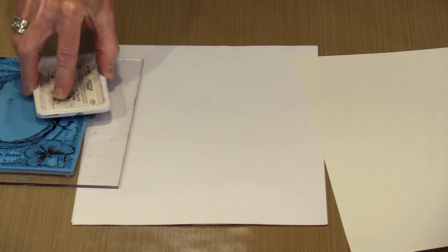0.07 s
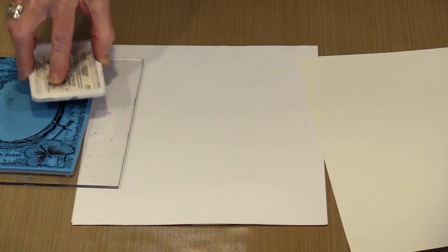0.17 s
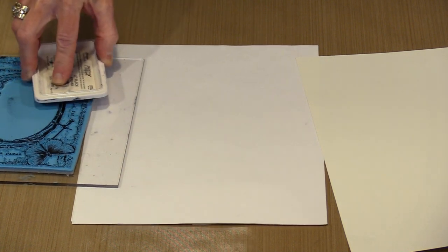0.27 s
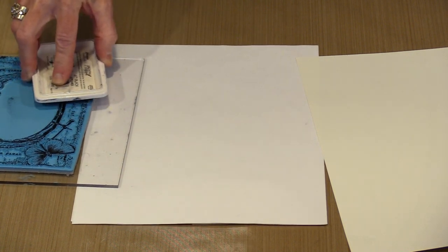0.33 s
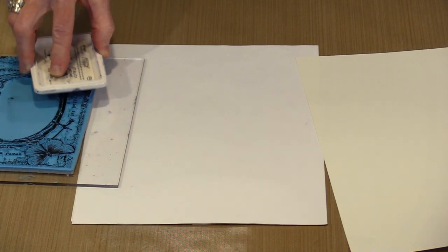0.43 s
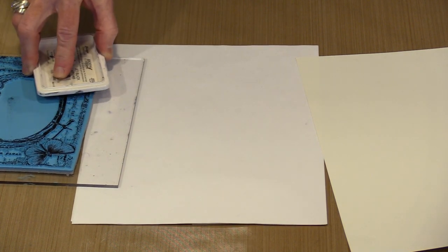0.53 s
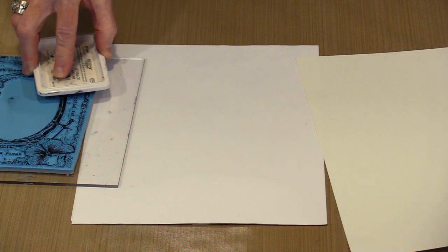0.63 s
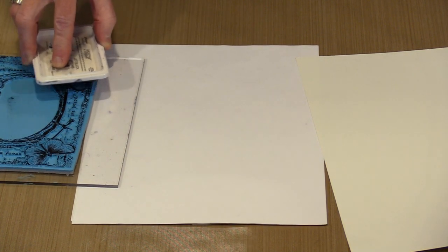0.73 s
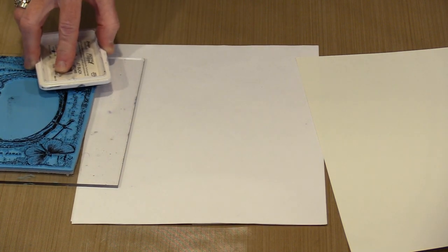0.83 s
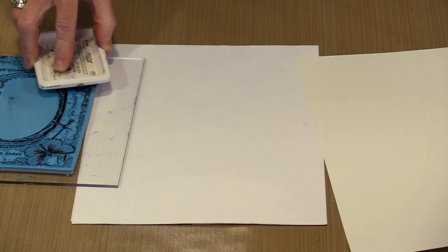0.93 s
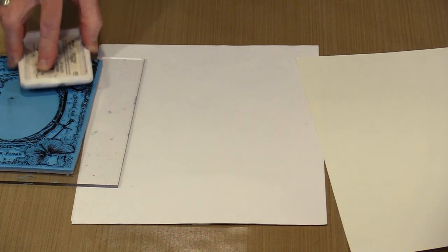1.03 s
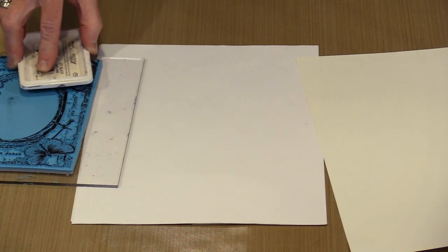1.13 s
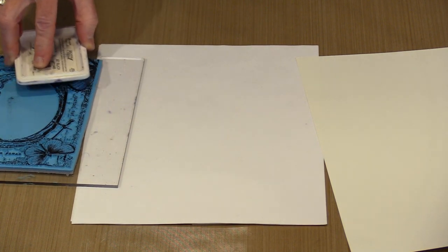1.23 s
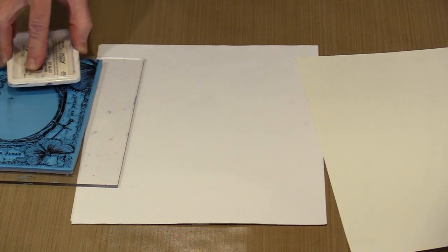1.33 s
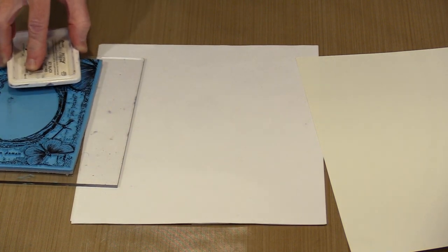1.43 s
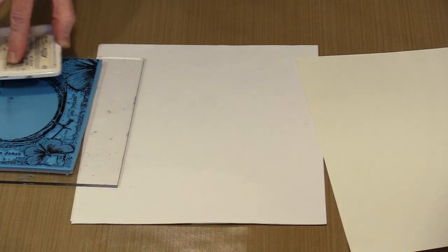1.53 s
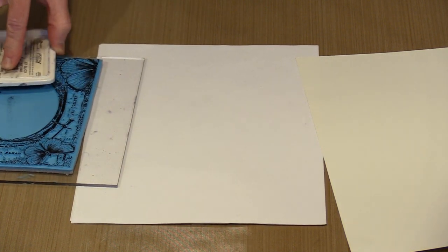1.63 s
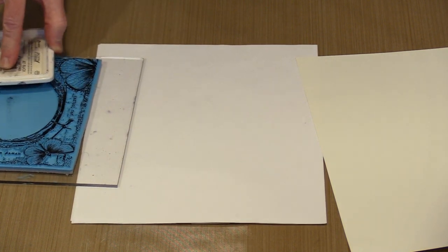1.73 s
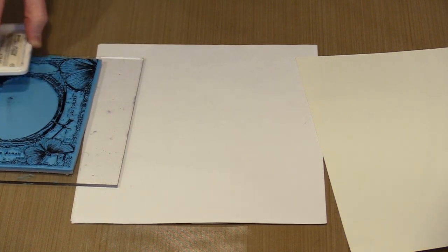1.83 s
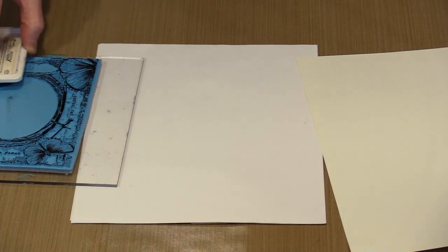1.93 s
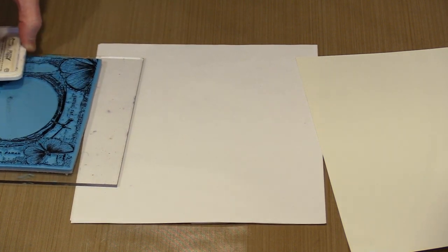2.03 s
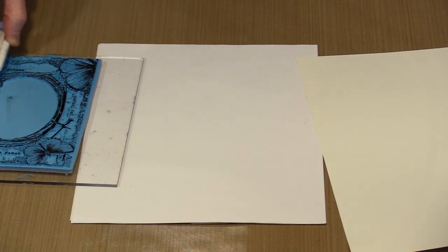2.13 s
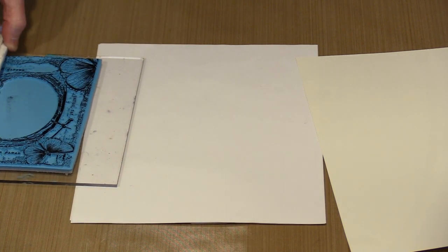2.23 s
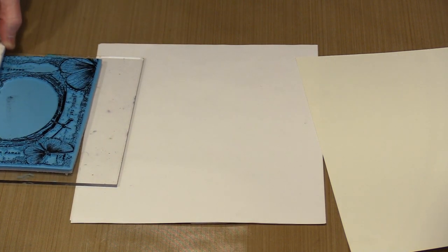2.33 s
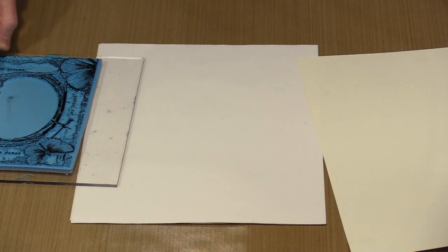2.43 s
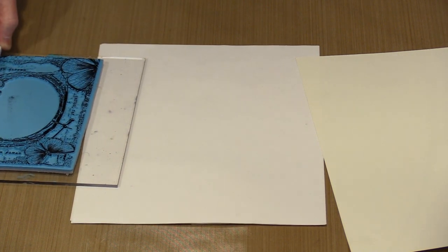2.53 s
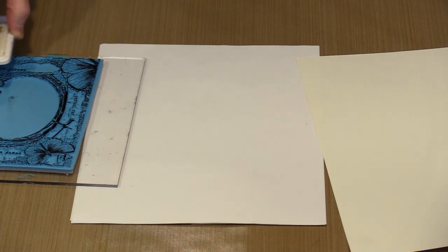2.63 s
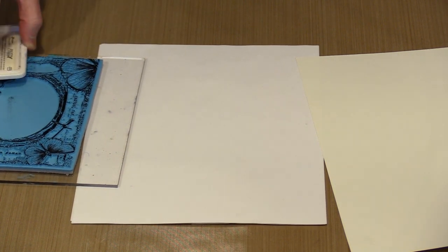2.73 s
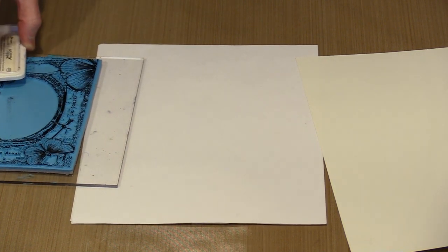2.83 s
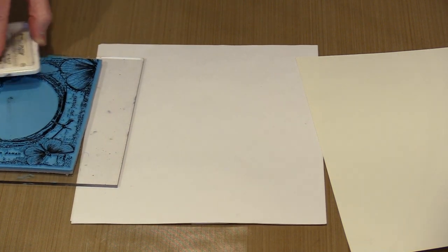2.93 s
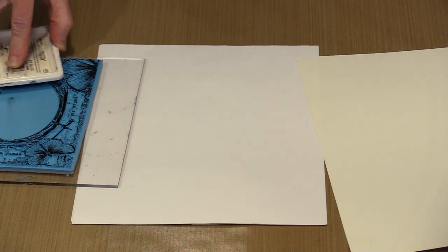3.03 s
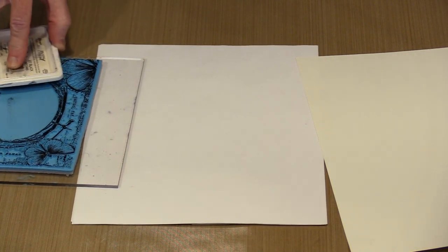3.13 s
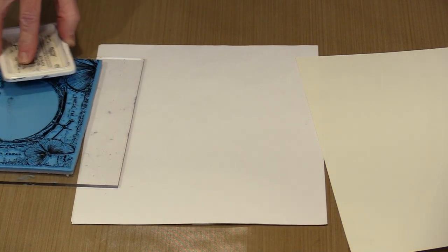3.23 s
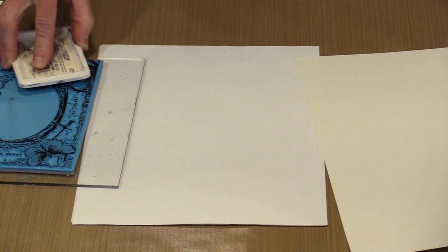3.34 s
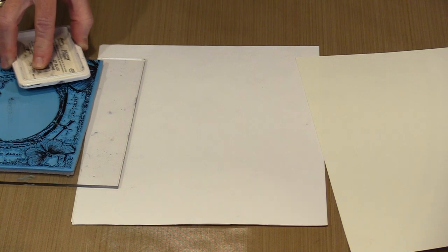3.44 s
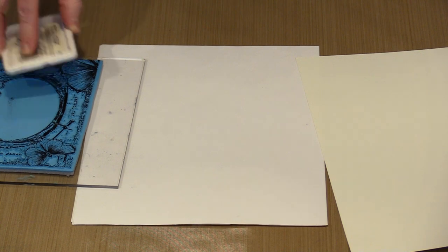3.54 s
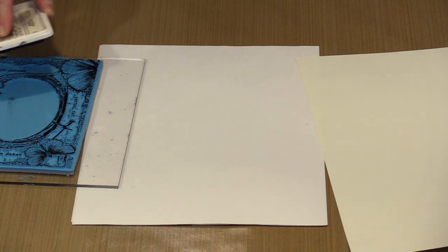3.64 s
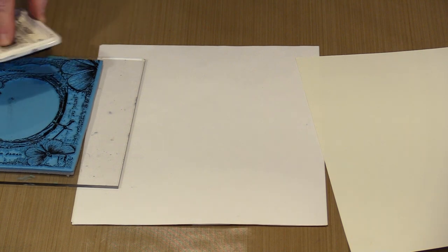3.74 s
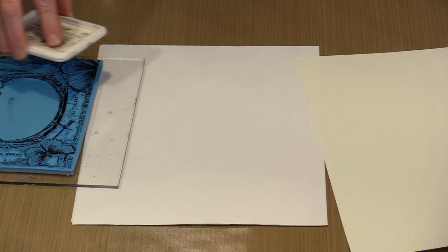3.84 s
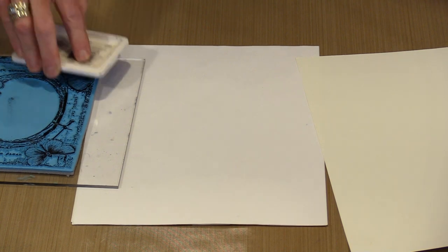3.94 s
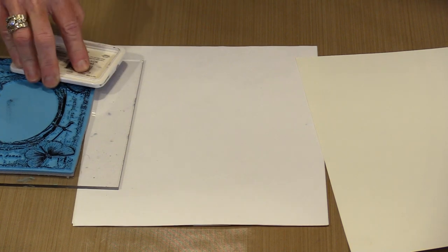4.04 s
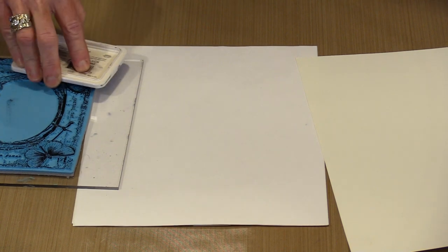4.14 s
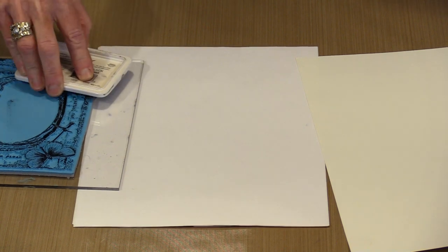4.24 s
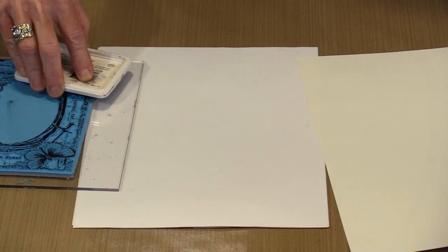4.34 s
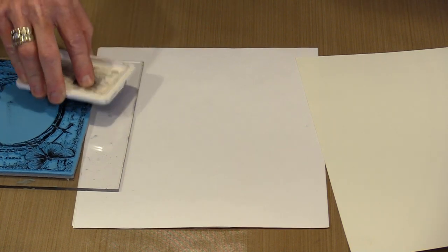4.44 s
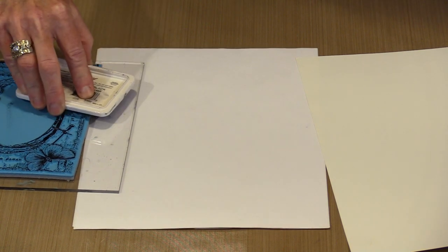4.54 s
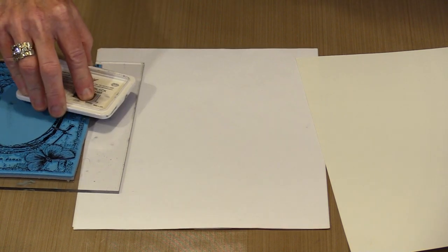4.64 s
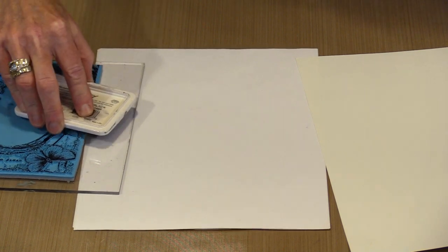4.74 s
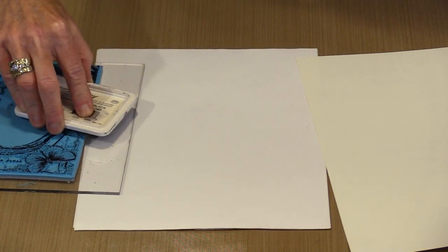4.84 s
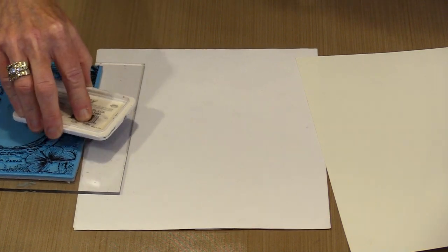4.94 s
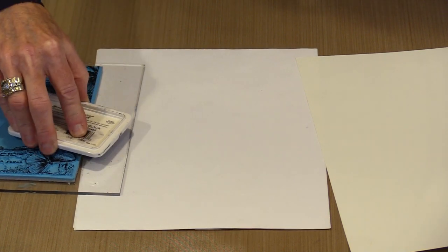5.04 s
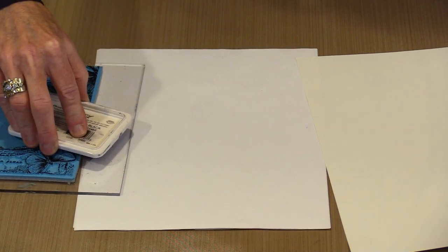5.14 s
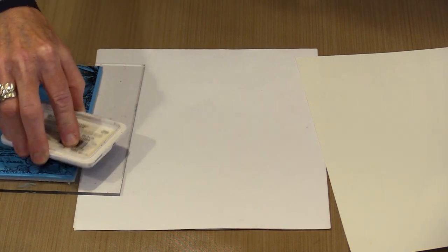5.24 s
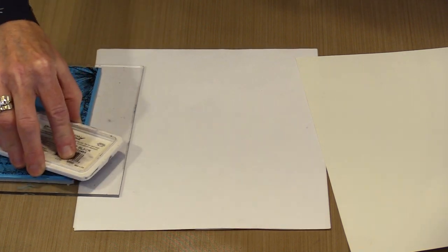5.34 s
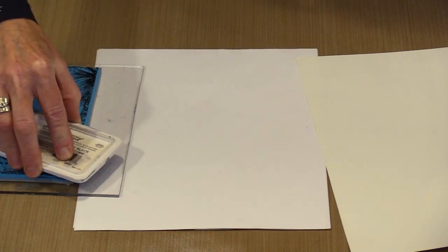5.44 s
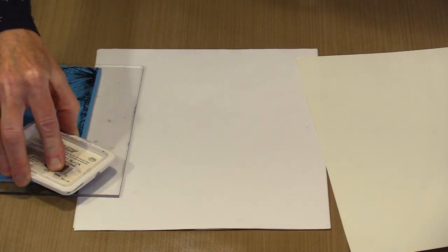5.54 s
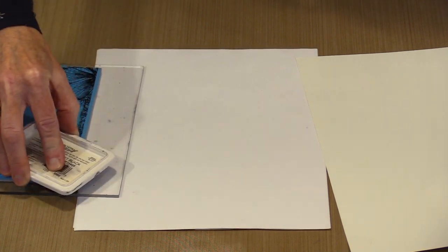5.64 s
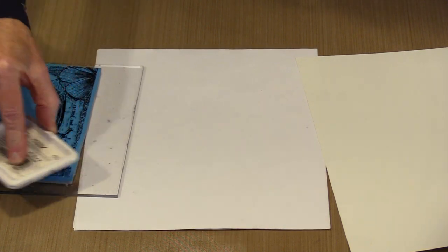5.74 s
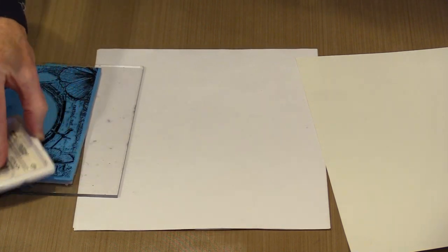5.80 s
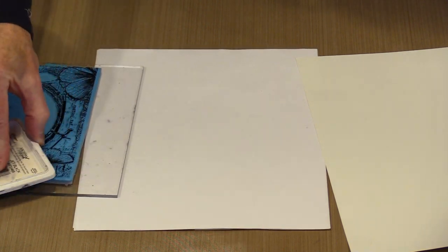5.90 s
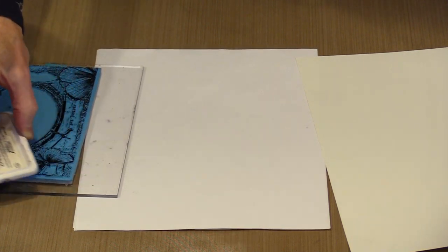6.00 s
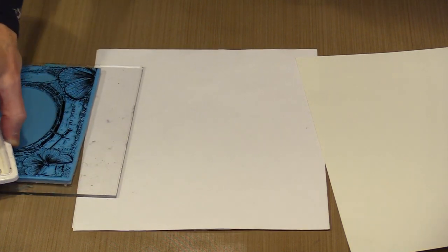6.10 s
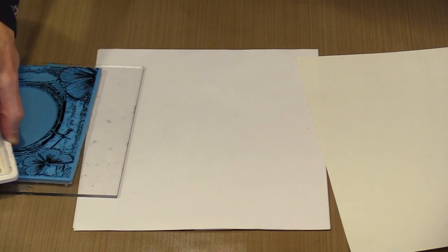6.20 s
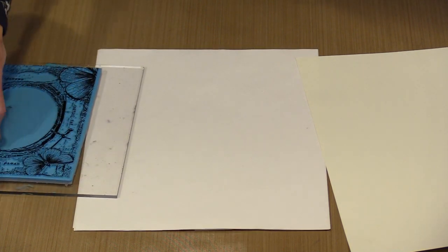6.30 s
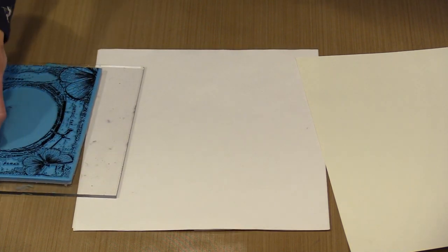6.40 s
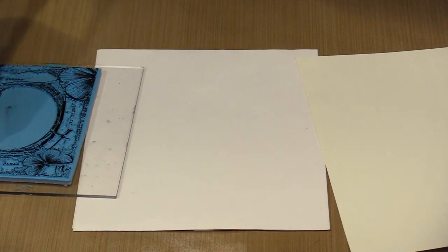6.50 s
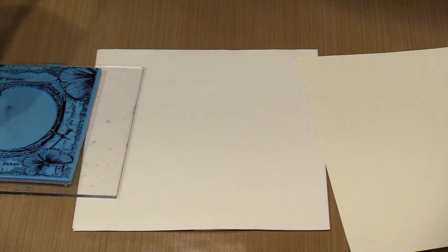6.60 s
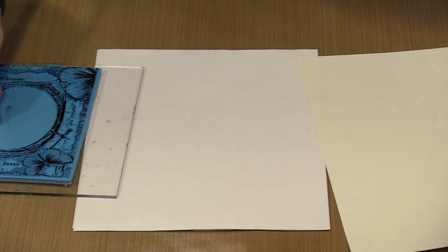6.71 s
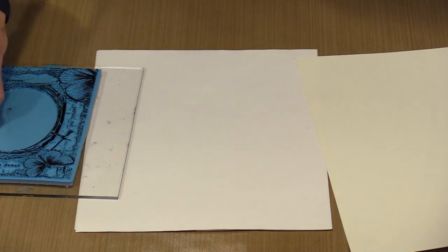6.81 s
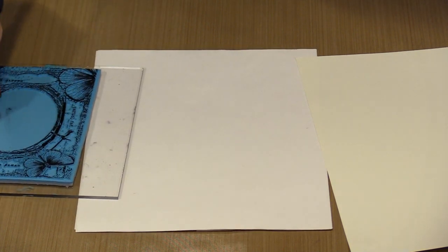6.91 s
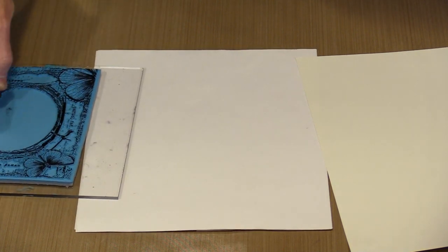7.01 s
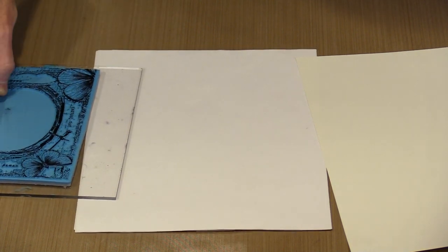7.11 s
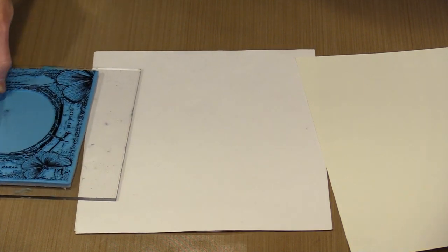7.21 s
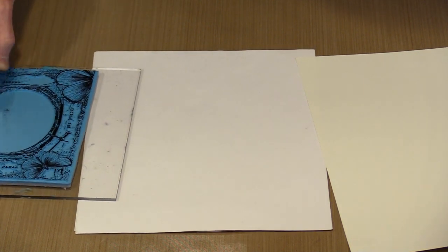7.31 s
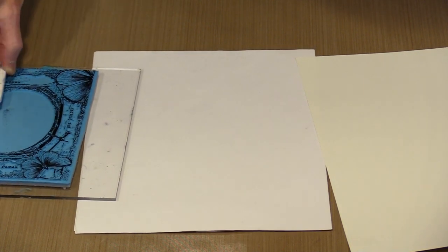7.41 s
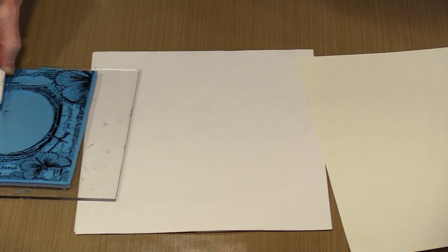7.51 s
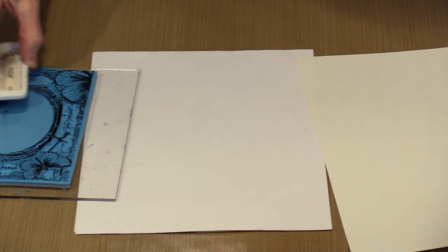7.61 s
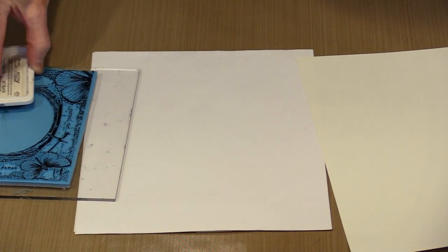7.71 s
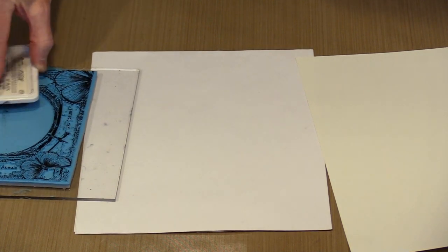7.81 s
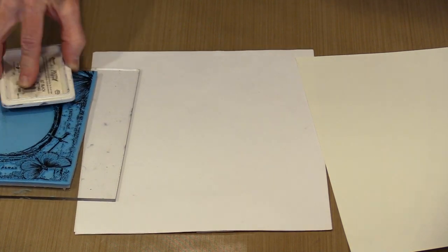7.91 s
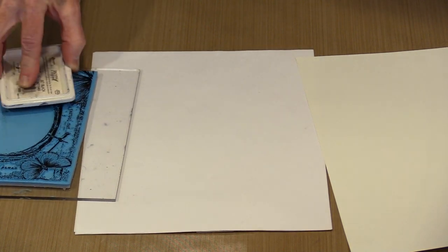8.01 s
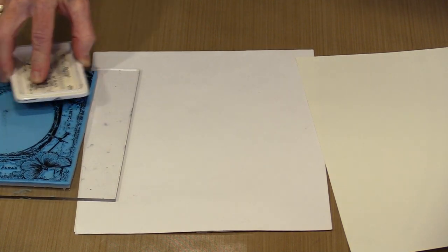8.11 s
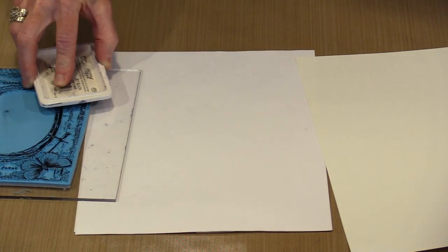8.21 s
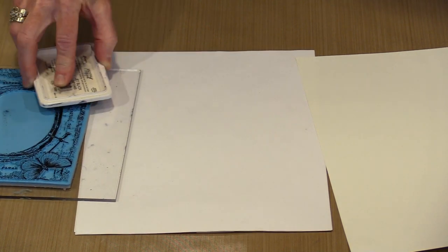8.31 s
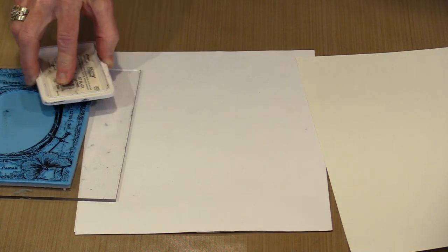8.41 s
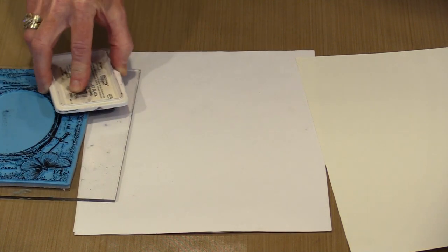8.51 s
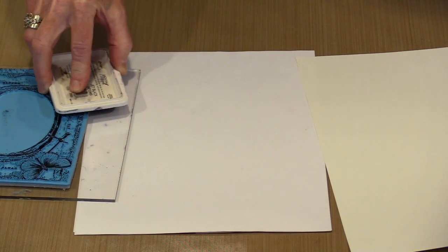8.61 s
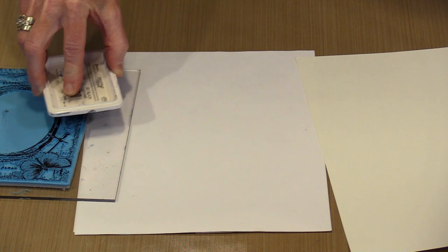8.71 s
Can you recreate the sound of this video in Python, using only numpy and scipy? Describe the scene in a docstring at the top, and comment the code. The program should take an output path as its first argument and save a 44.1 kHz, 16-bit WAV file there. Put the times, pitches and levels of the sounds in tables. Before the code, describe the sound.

Quick, even taps of an ink pad on a rubber stamp thud and clack on a table in a small, quiet room.

```python
"""Inking a rubber stamp

A small, fairly dry room with a faint fan-like hush; a stereo camera microphone close to the table.
A plastic-cased ink pad is dabbed about four times a second onto a rubber stamp on a clear plate.
Each dab thumps the table, thuds the plate, knocks on the rubber and rattles the case.
Tacky ink ticks, the hollow case pocks under the fingers, and once it snaps sharply."""
import sys
import numpy as np
from scipy import signal
from scipy.fft import rfft, irfft, next_fast_len
from scipy.io import wavfile

SR = 44100
rng = np.random.default_rng(int(sys.argv[2]) if len(sys.argv) > 2 else 0)


def waveform_to_disk(signal):
    """Save audio, clipped to [-1, 1], as 16-bit WAV at the path in sys.argv[1]."""
    frames = np.transpose(np.atleast_2d(signal))
    scaled = np.clip(frames, -1, 1) * 32767
    samples = np.round(scaled).astype(np.int16)
    wavfile.write(sys.argv[1], SR, samples)


N = 386139
T = np.arange(SR // 4) / SR  # time within one impact or room tail, s

# room tone spectrum: f/Hz, relative density/dB
HUSH_SPECTRUM = [(15, -52), (25, -13), (84, -9), (110, -2), (170, -6.5), (241, -5), (269, -9.5), (307, -7),
                 (691, -10), (981, -10), (1090, -11), (1550, -15.5), (1680, -15), (6490, -24.5),
                 (15800, -35.5)]
# humming bands in the room tone: f/Hz, width/Hz, height/dB
HUM_BANDS = [(119.7, 3.1, 7.9), (230, 23, 2.6), (1125, 123, 8.6)]
# room tone across the stereo pair: f/Hz, left-right correlation
HUSH_CORRELATION = [(60, 0.66), (150, 0.7), (380, 0.0021), (950, -0.38), (2380, 0.28), (5980, 0.59),
                    (15000, 0.67)]
# reverberation: f/Hz, t60/s
ROOM_DECAY = [(100, 0.47), (400, 0.22), (1000, 0.29), (2500, 0.29), (6500, 0.22), (14000, 0.2)]
# reflections off the nearest surfaces: delay/s, left gain, right gain
REFLECTIONS = [(.0056, 0.039, 0.3), (.0088, 0.33, 0.19), (0.0156, 0.15, 0.2), (0.021, 0.0022, 0.029)]
# resonances of the struck parts: f/Hz, level/dB, t60/s
TABLE_MODES = [(58, 2.5, 0.19), (84.1, 0.5, .27), (90.6, -4, 0.25)]
PLATE_MODES = [(155, -5.5, 0.22), (169.5, 1, 0.18), (201.8, -5, 0.094), (231.5, -1.5, 0.14),
               (263, -2, 0.07), (309.3, -8, 0.24)]
PAD_MODES = [(335.5, -20.5, 0.14), (359.7, -15.5, 0.13), (412.3, -17, 0.13), (554.2, -15.5, 0.089),
             (615.7, -17, 0.14)]
CASE_MODES = [(680.3, -2, 0.053), (798, -2, 0.1), (970, -2, 0.059), (1000, -21, 0.0043), (1284, -53, 0.019),
              (1383, 3, 0.033), (1504, -5, 0.039)]
RIM_MODES = [(1900, -9.5, 0.01), (2195, 13, 0.053), (2300, -22, 0.05), (2610, 11, .045), (2754, -25, 0.097),
             (3177, 9, 0.037), (3664, 11, 0.038)]
SNAP_MODES = [(500, 0, 0.1), (1110, -17.5, 0.88), (1550, -14, .11), (1710, -5, 0.23), (2040, -15, 0.1),
              (2236, 7.5, 0.11), (2555, 1, 0.09), (2684, 0, 0.089), (3192, -19, .15), (3570, -17, .15),
              (4340, -26, 0.05)]
# spectra of the contact noises: f/Hz, level/dB
FOAM_SPECTRUM = [(70, -23.5), (130, -6.5), (170, -2.5), (240, 2), (330, -4.5), (450, -2), (800, -38.5),
                 (3000, -69.5)]
CLACK_SPECTRUM = [(150, -34), (300, -16), (570, 4.5), (700, 6.5), (1000, 1.5), (1500, 1), (1750, -9.5),
                  (2600, -22), (8000, -76)]
RATTLE_SPECTRUM = [(400, -53), (1000, -40), (1600, 3.5), (1950, 0.5), (3400, -5), (4500, -8), (5500, -19),
                   (8000, -32.5), (14000, -46)]
RIM_TICK_SPECTRUM = [(900, -41), (2800, -21), (4400, 3.5), (5300, 6.5), (6500, -3), (8800, -11),
                     (11000, -27), (15000, -56)]
SNAP_SPECTRUM = [(60, -37), (250, -26), (500, 1.5), (900, -2.5), (1500, 6), (3200, -0.5), (4600, -8),
                 (7000, -17.5), (11000, -25.5), (15000, -54)]
POCK_SPECTRUM = [(250, -29.5), (560, -5), (720, -12), (940, -6), (1150, -13.5), (1500, -22), (3000, -31.5),
                 (9000, -63)]
# spectrum of an ink tick: multiple of its centre frequency, level/dB
INK_SPECTRUM = [(.25, -48), (0.602, -10), (0.998, -8), (1.298, -14), (2.5, -26), (4, -42)]
# tacky ink grabs or lets go: t/s, level/dB, centre f/Hz
INK_EVENTS = [(.567, -23.5, 9000), (1.868, -11.5, 5040), (1.993, -21, 3000), (2.055, -21.5, 3180),
              (2.412, -20.5, 3160), (3.823, -20.5, 7460), (4.02, -25, 9000), (5.332, -24, 7950),
              (6.771, -25, 7040), (7.961, -24, 8900)]
# the case snaps: t/s, level/dB
CASE_SNAPS = [(2.807, 15)]
# the fingers shift the hollow case: t/s, level/dB
CASE_POCKS = [(1.886, -13.5), (2.9565, 1.5)]
# dabs, levels relative within a column: t/s, table/dB, plate/dB, knock/dB, knock f/Hz, rim/dB
DAB_EVENTS = [(.011, 2, -1.5, 11, 490, -8), (.2768, 6, -4.5, 18, 495, 5), (.565, 7, 3.5, 12.5, 475, 1.5),
              (0.842, 7, 1, 12.5, 442, -0.5), (1.0956, 4, -2.5, 9.5, 483, -2.5),
              (1.3662, 6, -5, 1.5, 492, -1.5), (1.643, 4, 1.5, 4.5, 482, 1.5),
              (1.929, -1, -4.5, -2.5, 477, -2.5), (2.228, -5.5, -6.5, -5.5, 490, -10.5),
              (2.4846, -6.5, -10, -10, 471, -14), (2.7799, 3.5, -6, -2.5, 495, -9),
              (3.0599, 5, -1.5, -3.5, 460, -1.5), (3.347, 3.5, -2, 6.5, 482, -0.5),
              (4.0175, 9, 3.5, 17, 450, 5), (4.2724, 6.5, -1.5, 9, 466, -8.5), (4.5255, 5, -2, 7, 460, -7),
              (4.784, 3.5, -3.5, 2.5, 425, -7), (5.0524, 6, 0.5, 5, 456, -4), (5.331, 6.5, 2.5, 6, 508, -4),
              (5.578, 1.5, -3, -1, 346, -11.5), (5.8772, 3.5, 1, 3, 470, -13), (6.1313, 6.5, 1, 7, 500, -8),
              (6.381, 3, 4, 6.5, 510, 7.5), (6.7681, 0.5, -12.5, 14.5, 458, -1.5),
              (7.1079, 0, -5.5, 11.5, 490, -13), (7.4111, 3.5, 4, 14, 501, 2.5),
              (7.691, 5.5, 4.5, 4, 429, 3), (7.959, 3.5, -4, 7.5, 490, -2.5),
              (8.226, 3, -6.5, 1, 430, -14.5), (8.5487, 6, -0.5, 10.5, 436, -9)]
# resonances favoured as the hand travels round the stamp:
# t/s, plate f/Hz, clack level/dB, clack f/Hz, rattle f/Hz
HAND_PATH = [(.28, 243, -0.5, 1370, 2350), (.57, 295, 5, 990, 1930), (1.1, 220, -2, 1320, 2180),
             (1.64, 208, -.5, 1390, 2850), (3.06, 188, 0, 1310, 2700), (4.018, 266.5, -4.5, 1410, 1950),
             (4.78, 191, 3.5, 970, 2470), (5.33, 156, 2, 700, 2640), (6.13, 166, 2, 837, 3100),
             (7.11, 178, -2.5, 927, 1980), (7.41, 179, -3.5, 1340, 2960), (7.688, 166.2, -2.5, 858, 3720),
             (8.55, 193, 1.5, 860, 2150)]

HUSH_DB, PLATE_DB, KNOCK_DB, RATTLE_DB = -47, 4, -1.38, 0.1
DAB_PERIOD_S = 0.28


def amp(db):
    """Decibels to gain."""
    return 10 ** (np.asarray(db) / 20)


def unit(x):
    """Scales each channel to an energy of one."""
    return x / np.sqrt(np.sum(x ** 2, axis=-1, keepdims=True) + 1e-20)


def read(points, hz):
    """Reads a table along a logarithmic frequency axis."""
    f, value = np.transpose(points)
    return np.interp(np.log(hz + 1), np.log(f + 1), value)


def add(mix, s, sound):
    """Adds a sound to both channels at time s."""
    part = mix[:, max(round(s * SR), 0):][:, :sound.shape[-1]]
    part += sound[..., :part.shape[1]]


def colour(x, spectrum):
    """Causal filter with the given spectrum."""
    size = 2 * len(T)
    log_gain = np.log(amp(read(spectrum, abs(np.fft.fftfreq(size, 1 / SR)))))
    response = np.exp(np.conj(signal.hilbert(log_gain)))[:size // 2 + 1]
    return irfft(rfft(x, size) * response)[..., :len(T)]


def swell(rise):
    """A smooth onset over about `rise` seconds."""
    return 1 - np.exp(-(T / rise) ** 2)


def ring(modes, rise, spread_db=0, detune=0):
    """Dying modes; random weight and tuning stand for where the blow lands and how the pad is held."""
    hz, db, t60 = np.transpose(modes)[:, :, None]
    weight, shift, polarity = rng.uniform(-1, 1, (3, len(modes), 1))
    waves = np.sign(polarity) * np.sin(2 * np.pi * hz * (1 + detune * shift) * T)
    decays = amp(db + spread_db * weight - 60 * T / t60)
    return unit((decays * waves).sum(0) * swell(rise))


def crunch(spectrum, rise, t60, width):
    """A short cluster of tiny impacts, slightly different on each side of the microphone."""
    envelope = swell(rise) * amp(-60 * T / t60)
    noise = rfft(rng.standard_normal((2, len(T))) * envelope)
    # a flattened spectrum leaves the cluster little pitch of its own
    bursts = irfft(noise / np.sqrt(abs(noise) + 1e-9), len(T)) * envelope ** 0.25
    mid, side = unit(colour(bursts, spectrum))
    return unit(np.array([mid + width * side, mid - width * side]))


def favour(x, hz, q, lift_db):
    """The corner that lands first favours one broad resonance of the case."""
    b, a = signal.iirpeak(hz, q, SR)
    return unit(x + amp(lift_db) * signal.lfilter(b, a, x))


def modes_near(modes, hz, db_per_octave):
    """The struck spot stirs the modes near one pitch most."""
    return [(f, db - db_per_octave * abs(np.log2(f / hz)), t60) for f, db, t60 in modes]


def hush():
    """Room tone: steady, airy noise with a few soft humming bands."""
    size = next_fast_len(N, True)
    hz = np.fft.rfftfreq(size, 1 / SR)
    left, independent = rfft(rng.standard_normal((2, size)))
    correlation = read(HUSH_CORRELATION, hz)
    right = correlation * left + np.sqrt(1 - correlation ** 2) * independent
    hum_db = sum(height / (1 + (2 * (hz - f) / width) ** 2) for f, width, height in HUM_BANDS)
    noise = irfft(np.array([left, right]) * amp(read(HUSH_SPECTRUM, hz) + hum_db), size)[:, :N]
    return amp(HUSH_DB) * noise / np.std(noise.mean(0))


def room(x, wet_db, build_s):
    """Near surfaces reflect first; a short diffuse tail follows, weak in the bass."""
    noise = rng.standard_normal((3, len(T)))
    diffuse = (noise[:2] + noise[2]) * swell(build_s)  # the third noise reaches both sides
    hz, t, bands = signal.stft(diffuse, SR, nperseg=256)
    decay = amp(-60 * t / read(ROOM_DECAY, hz)[:, None])
    tail = signal.istft(bands * decay, SR, nperseg=256)[1][:, :len(T)]
    tail = colour(unit(tail), [(80, -20.5), (200, -5.5), (400, -1), (1000, -5), (3000, -3.5), (9000, 1)])
    tail *= amp(wet_db)
    for delay, left, right in REFLECTIONS:
        add(tail, delay, np.array([[left], [right]]))
    return signal.fftconvolve(x, tail, axes=1)[:, :N]


def shifting_room(x, tails):
    """The reflections change as the hand moves: a few tails take turns, about one a dab."""
    turns = np.arange(N) / SR / (tails * DAB_PERIOD_S)
    shares = np.array([np.maximum(np.cos(2 * np.pi * (turns - k / tails)), 0) ** 2 for k in range(tails)])
    shares /= np.linalg.norm(shares, axis=0)
    return sum(room(x * share, wet_db=-6.5, build_s=0.014) for share in shares)


def table_thumps(lag_s=0.01, lowest_hz=43.3):
    """Every dab flexes the table top in the same low modes; the deepest bass does not carry."""
    waves = sum(amp(db - 60 * T / t60) * np.sin(2 * np.pi * hz * (T - lag_s))
                for hz, db, t60 in TABLE_MODES)
    low_cut = signal.butter(6, lowest_hz, "high", fs=SR, output="sos")
    thump = unit(signal.sosfilt(low_cut, waves * swell(0.0048)))
    out = np.zeros((2, N))
    for s, db, *_ in DAB_EVENTS:
        add(out, s, amp(db) * thump)
    return out * amp([[-0.8], [0.9]])  # slightly right of centre


def ink_ticks():
    """Tacky ink ticks faintly as it grabs or lets go."""
    out = np.zeros((2, N))
    for s, db, hz in INK_EVENTS:
        spectrum = [(hz * multiple, level) for multiple, level in INK_SPECTRUM]
        add(out, s, amp(db) * crunch(spectrum, rise=0.00056, t60=0.023, width=0.25))
    return out


def case_handling():
    """The hollow case snaps with a ringing crack, and pocks as the fingers shift it."""
    out = np.zeros((2, N))
    for s, db in CASE_SNAPS:
        crack = crunch(SNAP_SPECTRUM, rise=0.00025, t60=0.058, width=0.48)
        add(out, s, amp(db) * unit(crack + 0.94 * ring(SNAP_MODES, rise=0.00052)))
    for s, db in CASE_POCKS:
        add(out, s, amp(db) * crunch(POCK_SPECTRUM, rise=0.0018, t60=0.063, width=0.37))
    return out


def rim_rattle(rim_db, hz):
    """A tilted landing rattles the rim; a hard tick grows with the rattle's level and pitch."""
    rim = ring(RIM_MODES, rise=0.00088, spread_db=5.5, detune=0.0091)
    contact = crunch(RATTLE_SPECTRUM, rise=0.0016, t60=0.038, width=0.39)
    rattle = favour(contact + 0.31 * rim, hz, q=1.8, lift_db=1)
    tick = crunch(RIM_TICK_SPECTRUM, rise=0.00038, t60=0.038, width=0.44)
    tick_db = -16 + 1.19 * rim_db + 7 * np.log2(hz / 2520)
    return amp(RATTLE_DB + rim_db) * rattle + amp(tick_db) * tick


def case_clack(knock_db, rim_db, hz):
    """The thin plastic clacks, bright and brief, growing with both the knock and the rattle."""
    case = ring(CASE_MODES, rise=0.003, spread_db=4, detune=0.014)
    contact = crunch(CLACK_SPECTRUM, rise=0.0028, t60=0.037, width=0.34)
    clack = favour(contact + 0.56 * case, hz, q=2.2, lift_db=-2)
    return amp(0.57 * knock_db + 0.59 * rim_db) * clack * amp([[0.6], [-0.6]])  # slightly left of centre


def plate_thud(hz):
    """The foam's dull blow sets the plate ringing under the stamp."""
    modes = modes_near(PLATE_MODES, hz, db_per_octave=12.5)
    plate = ring(modes, rise=0.0017, spread_db=2, detune=0.016)
    return unit(plate + 0.63 * crunch(FOAM_SPECTRUM, rise=0.0014, t60=0.088, width=0.063))


def pad_knock(hz, t60=0.021, crest_s=0.005005, stir_db=-10):
    """The pad bounces on the rubber as its foam gives: one damped note that stirs its neighbours."""
    note = amp(-60 * T / t60) * np.cos(2 * np.pi * hz * (T - crest_s)) * swell(0.0071)
    modes = modes_near(PAD_MODES, hz, db_per_octave=10.5)
    stirred = ring(modes, rise=0.017, spread_db=2.5, detune=0.035)
    return unit(unit(note) + amp(stir_db) * stirred)


def dabs():
    """Close to the microphone, each dab thuds, knocks, clacks and rattles according to how it lands."""
    out = np.zeros((2, N))
    path_s, *path = np.transpose(HAND_PATH)
    for s, _, plate_db, knock_db, knock_hz, rim_db in DAB_EVENTS:
        plate_hz, clack_db, clack_hz, rattle_hz = (np.interp(s, path_s, column) for column in path)
        add(out, s, amp(PLATE_DB + plate_db) * plate_thud(plate_hz))
        add(out, s, amp(KNOCK_DB + knock_db) * pad_knock(knock_hz))
        add(out, s, amp(clack_db) * case_clack(knock_db, rim_db, clack_hz))
        add(out, s, rim_rattle(rim_db, rattle_hz))
    return out


def scene():
    """Close dabs and handling with the room's answer, over table thumps and room tone."""
    close = dabs() + case_handling() + ink_ticks()
    return close + shifting_room(close, tails=4) + table_thumps() + hush()


def record(dry):
    """The camera microphone drops rumble below 18 Hz and treble above 15.6 kHz."""
    low_cut = signal.butter(1, 18, "high", fs=SR, output="sos")
    high_cut = signal.firwin(511, 15600, window=("kaiser", 9), fs=SR)
    return signal.oaconvolve(signal.sosfilt(low_cut, dry), high_cut[None], "same", axes=1)


dry = scene()
out = record(dry)
waveform_to_disk(out)
```